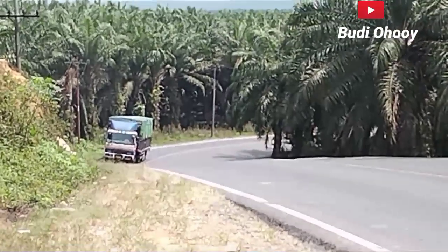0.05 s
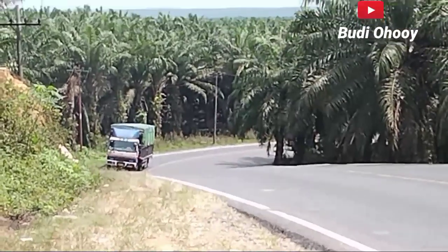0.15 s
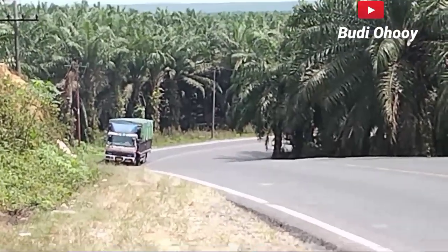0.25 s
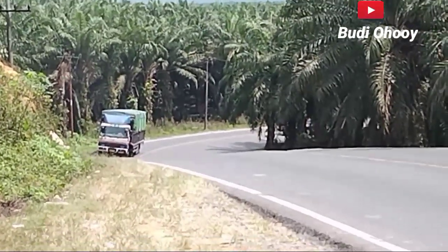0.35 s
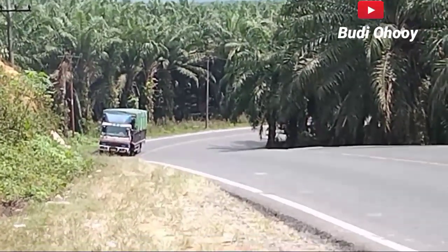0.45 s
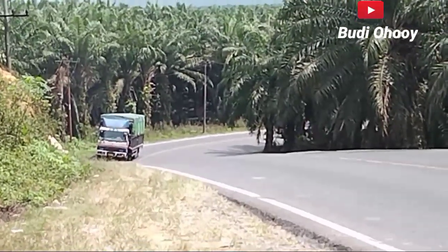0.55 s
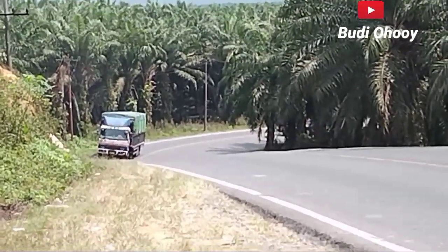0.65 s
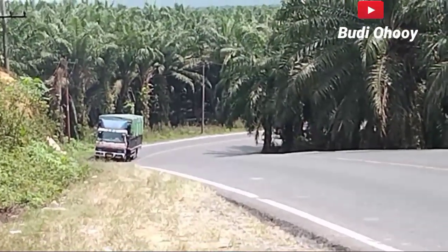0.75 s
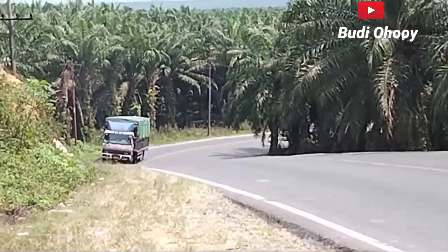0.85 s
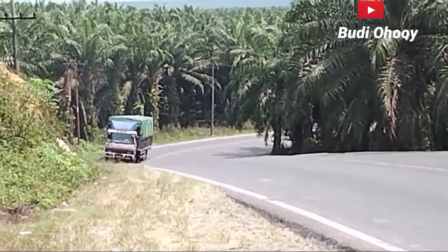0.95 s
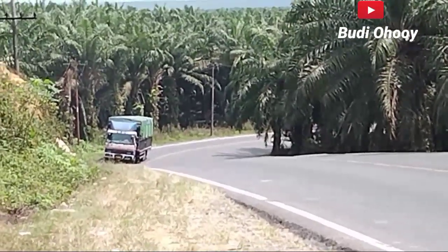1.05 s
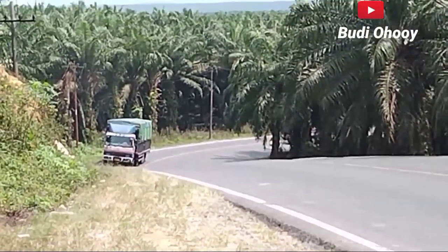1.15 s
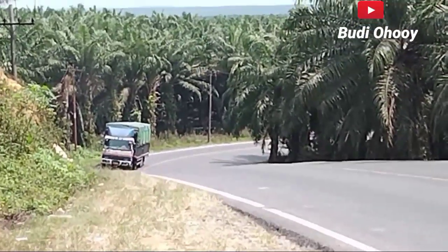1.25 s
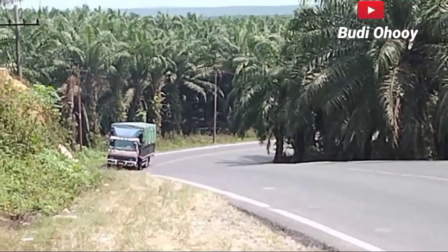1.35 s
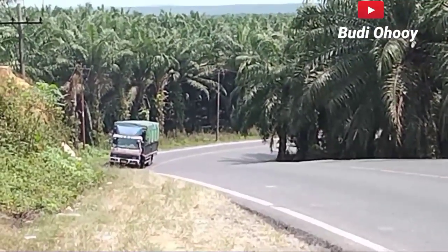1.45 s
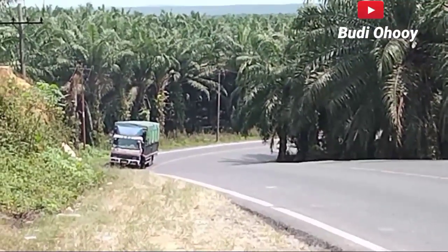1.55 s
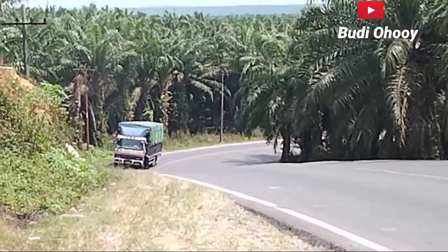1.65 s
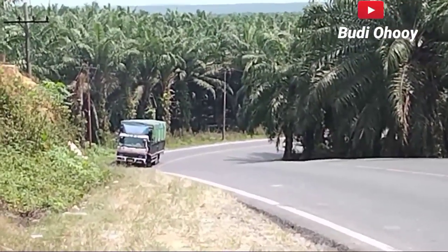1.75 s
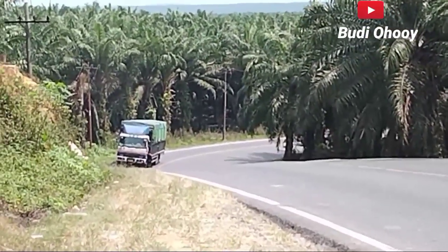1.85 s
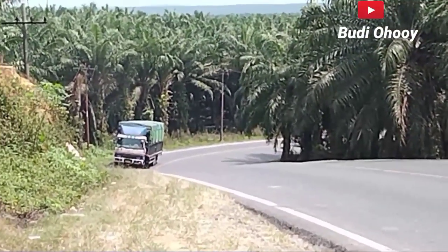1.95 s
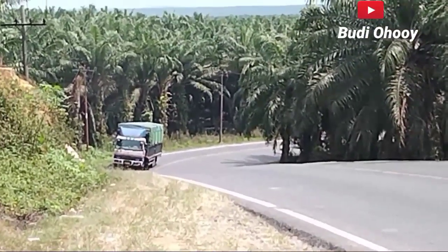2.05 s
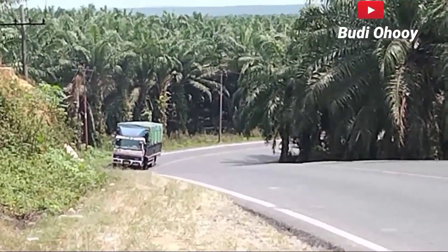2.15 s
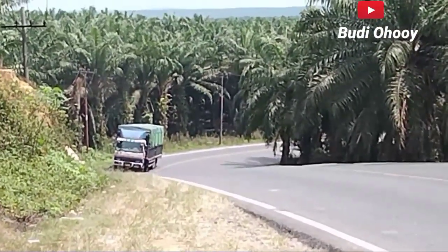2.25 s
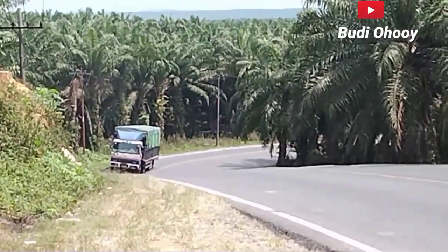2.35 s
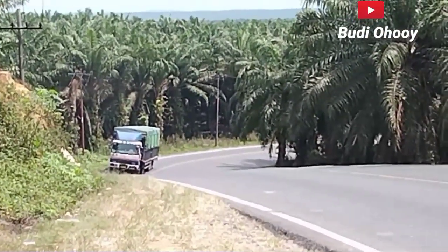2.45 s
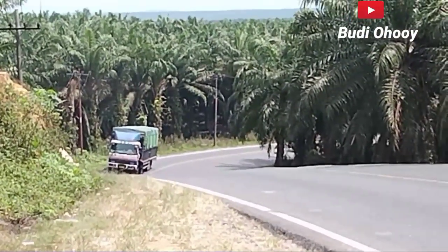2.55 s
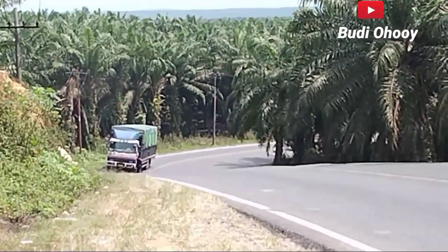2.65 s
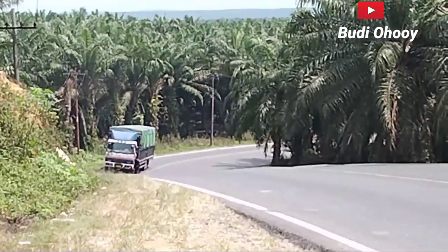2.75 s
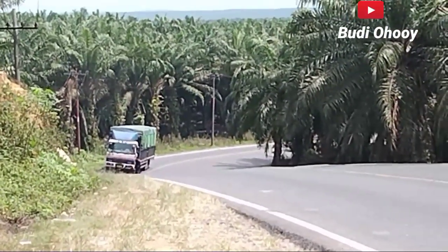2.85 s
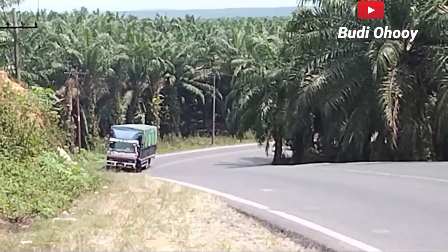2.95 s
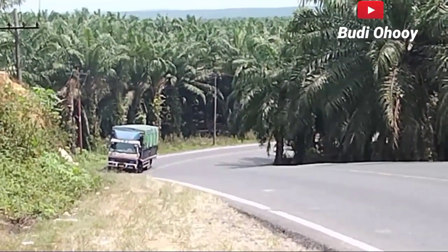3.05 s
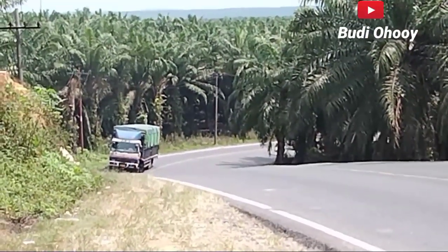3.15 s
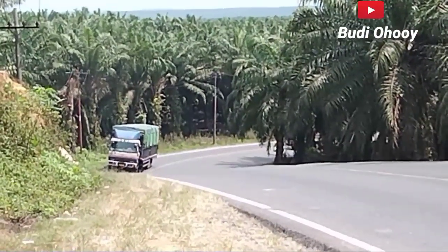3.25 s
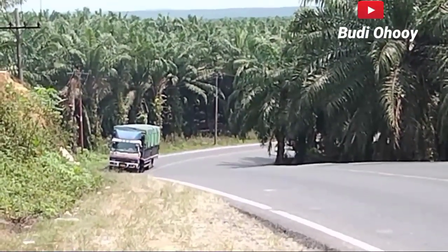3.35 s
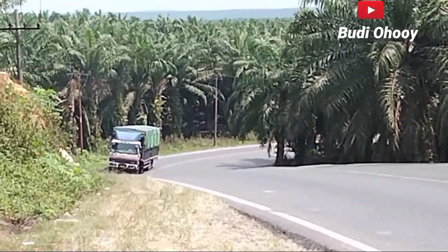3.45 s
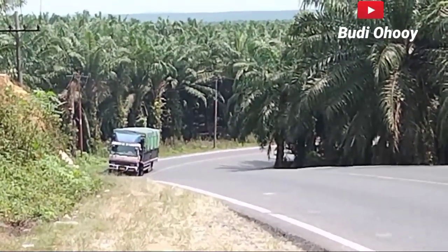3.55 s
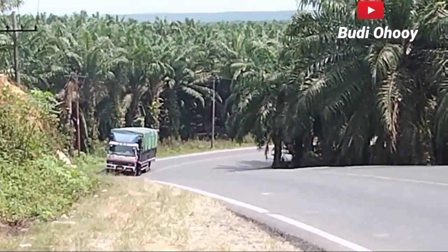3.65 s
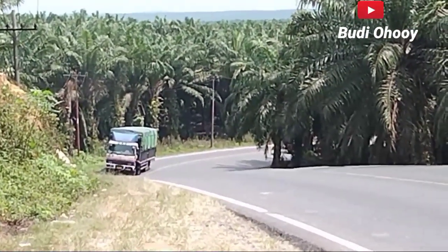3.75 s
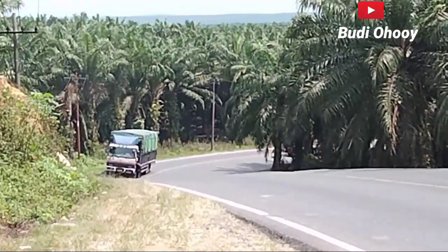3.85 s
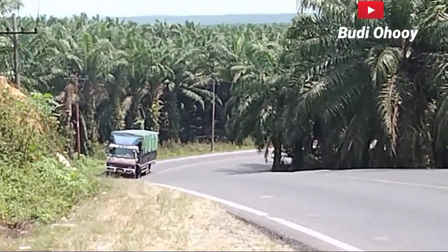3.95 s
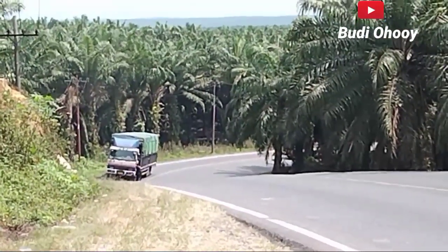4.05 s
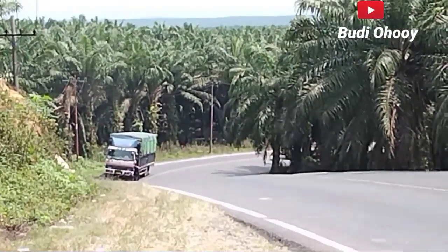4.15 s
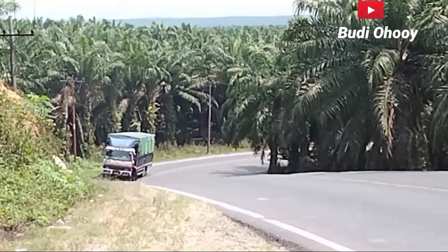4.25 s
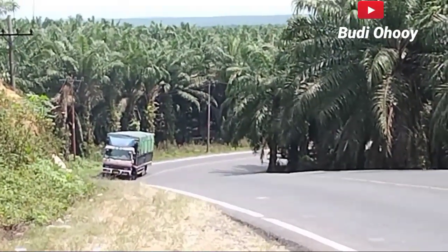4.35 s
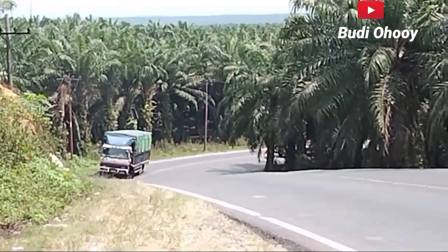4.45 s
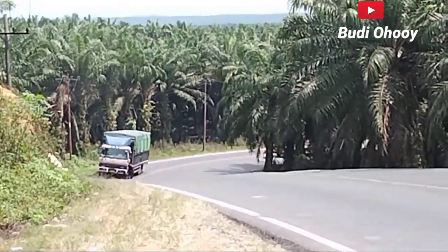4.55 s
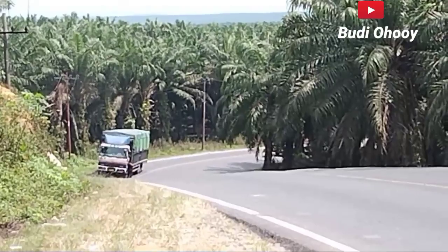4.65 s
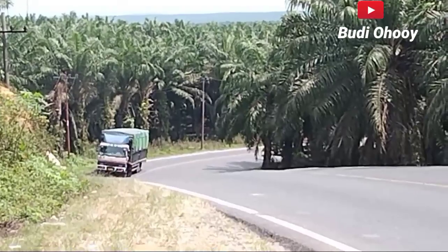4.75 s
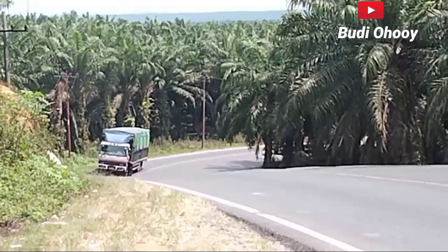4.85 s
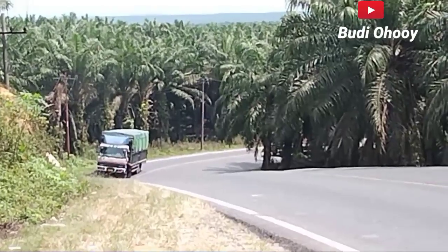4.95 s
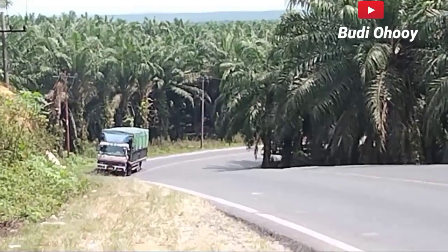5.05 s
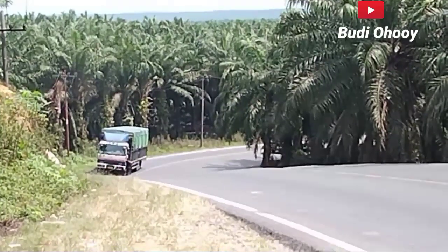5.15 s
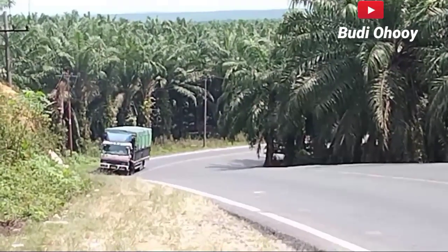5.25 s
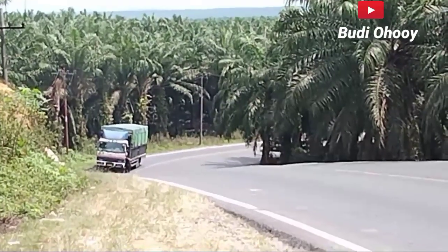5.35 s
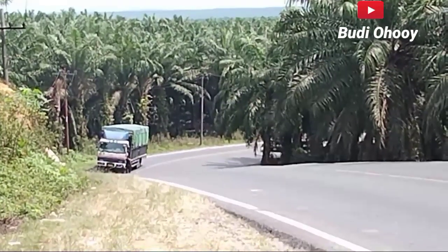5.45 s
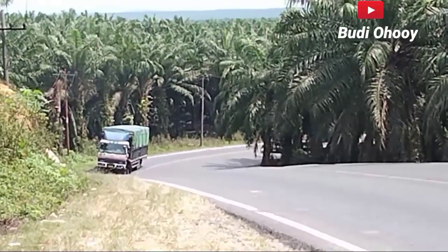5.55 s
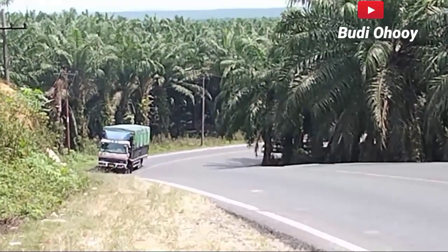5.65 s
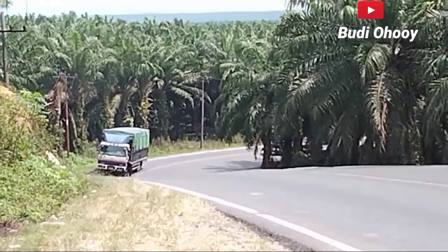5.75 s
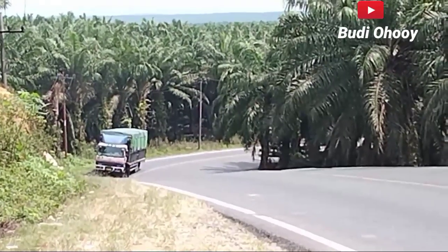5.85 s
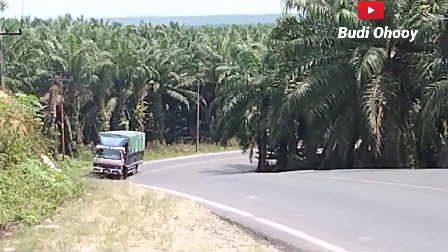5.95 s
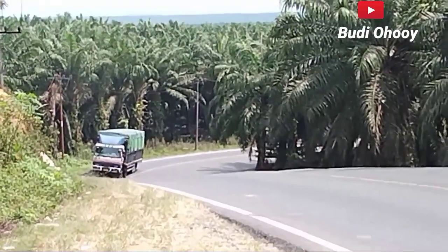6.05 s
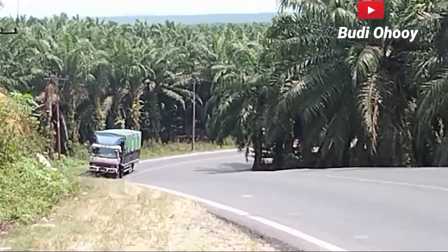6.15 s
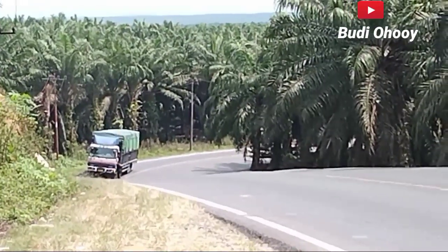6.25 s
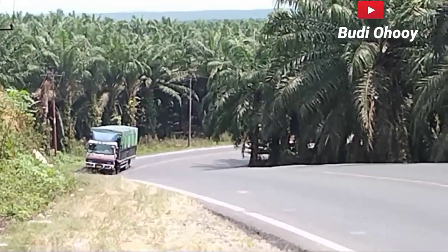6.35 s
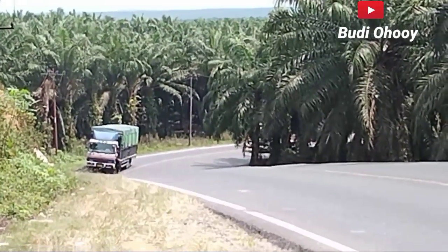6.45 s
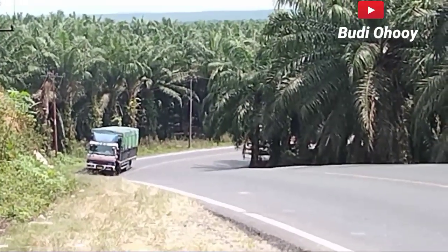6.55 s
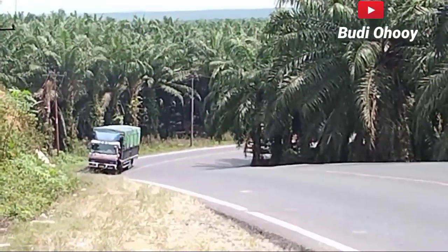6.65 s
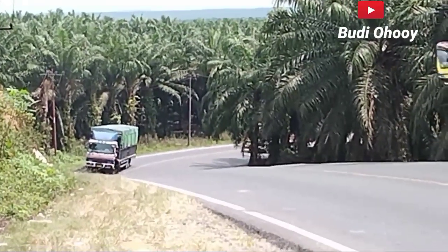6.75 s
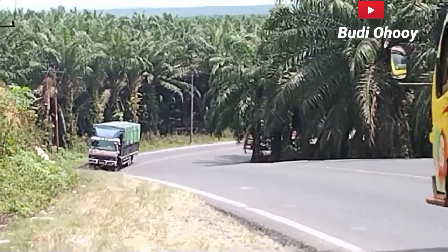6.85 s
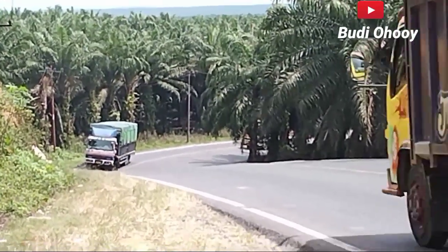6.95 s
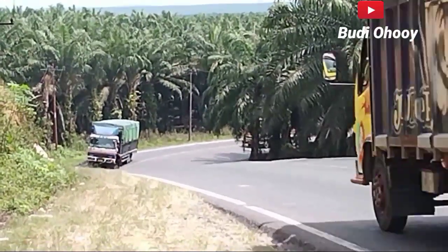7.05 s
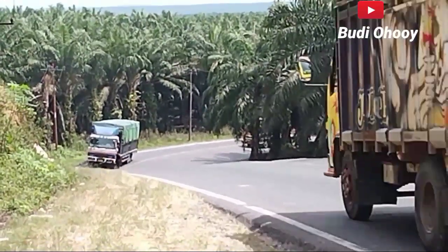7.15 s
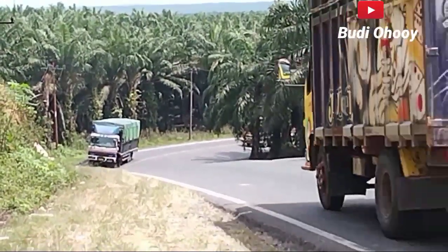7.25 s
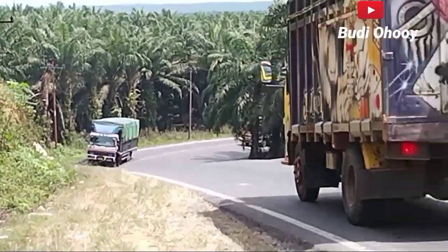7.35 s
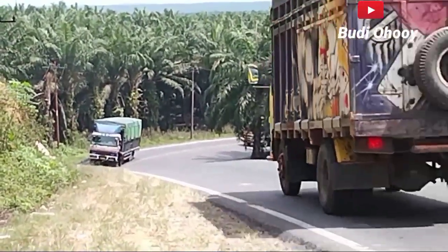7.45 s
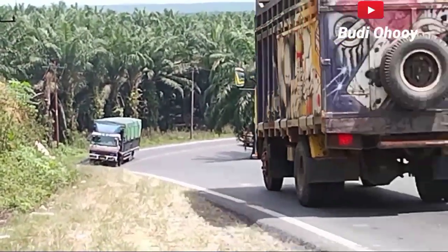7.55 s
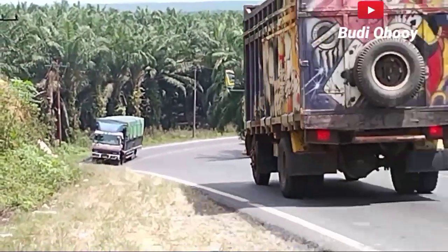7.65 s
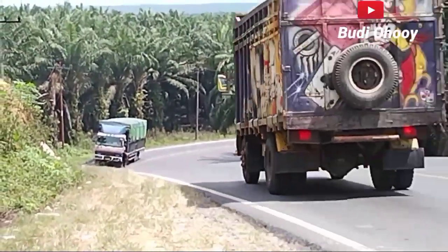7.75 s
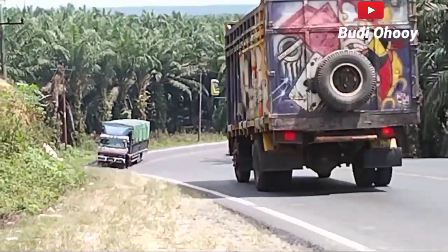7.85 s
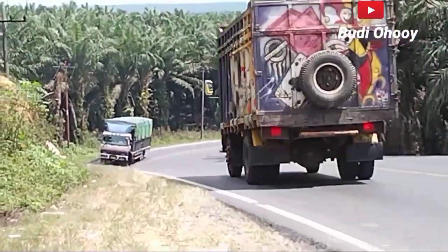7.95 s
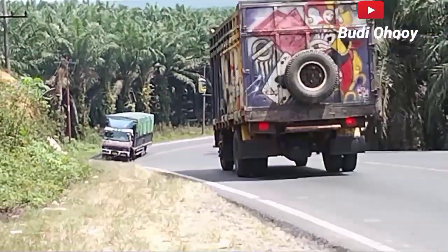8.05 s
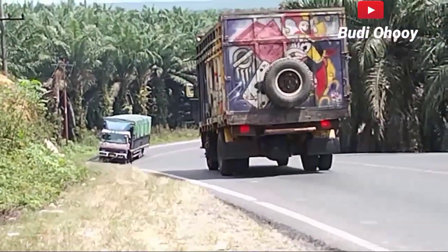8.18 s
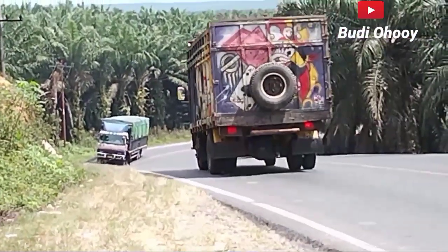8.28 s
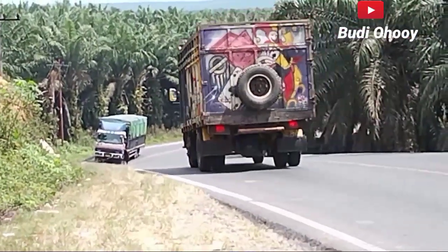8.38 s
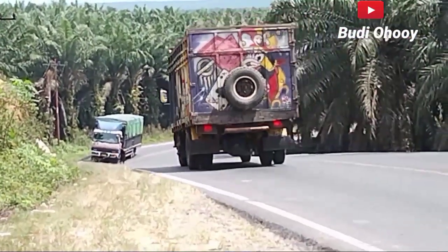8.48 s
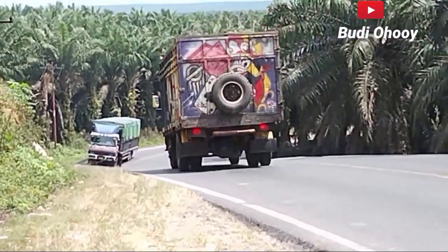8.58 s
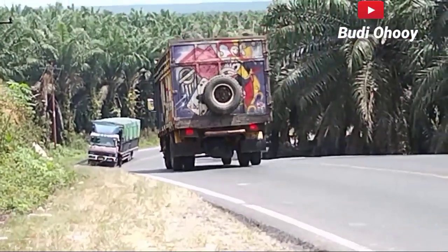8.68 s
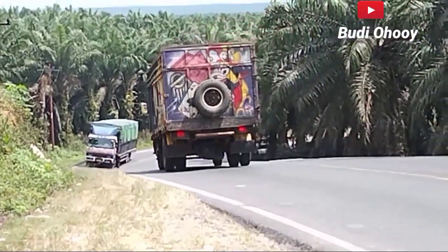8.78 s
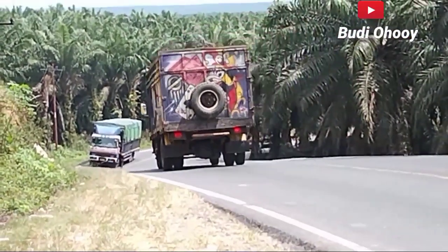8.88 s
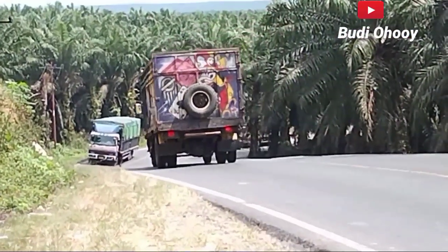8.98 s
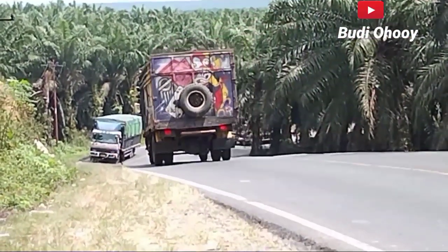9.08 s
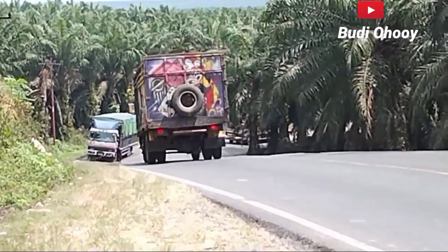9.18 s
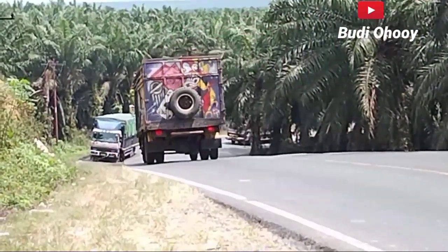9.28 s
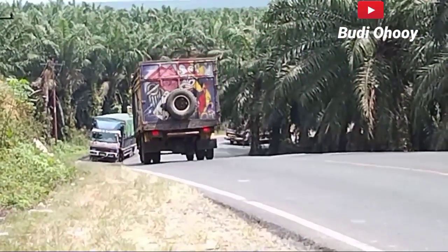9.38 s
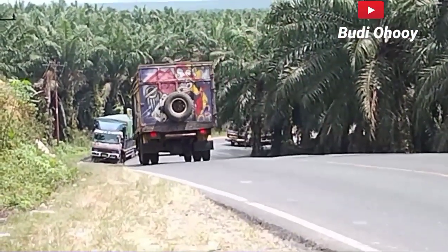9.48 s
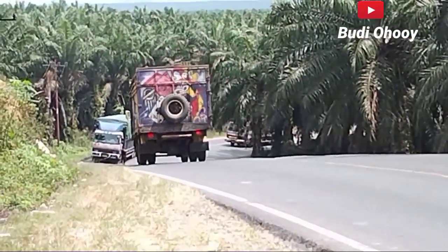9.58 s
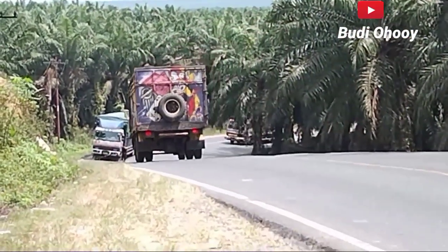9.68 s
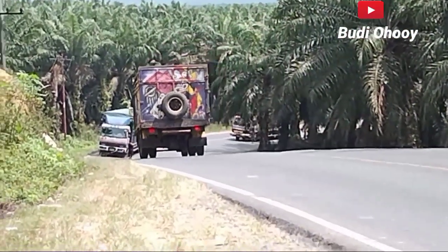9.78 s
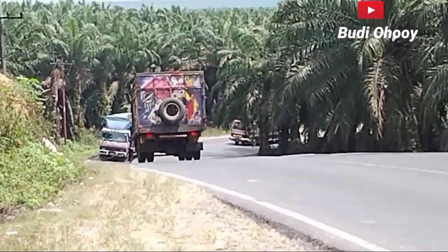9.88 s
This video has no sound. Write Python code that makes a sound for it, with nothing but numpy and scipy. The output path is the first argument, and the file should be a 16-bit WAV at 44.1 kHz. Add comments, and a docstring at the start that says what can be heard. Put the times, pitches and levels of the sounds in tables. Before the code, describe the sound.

One short distant horn toot echoes through palms, then a diesel truck drones up, rushes past and recedes, whining and rattling.

```python
"""Diesel truck passing on a hill road

A truck with a slatted cargo body drives past close by, its revs sinking. Exhaust drone (crank orders),
engine knock and tyre roar (noise throbbing with the firings) swell out of distant traffic. It draws away
with a gear whine locked to the crank, squeaking (wavering tones) and clacking (decaying noise bursts).
A horn (buzzing overtones) toots once in the distance and rings through the palms; a thin tick sounds close by.
"""
import sys
import numpy as np
from scipy import signal
from scipy.fft import rfft, irfft
from scipy.io import wavfile
from scipy.ndimage import uniform_filter1d

SR = 44100
rng = np.random.default_rng(int(sys.argv[2]) if len(sys.argv) > 2 else 0)


def wav_record(signal):
    """Record a signal, one row per channel, as 16-bit PCM in the file named by sys.argv[1]."""
    frames = np.transpose(np.atleast_2d(signal))
    bounded = np.clip(frames, -1, 1)
    # unit amplitude maps onto the largest positive 16-bit level
    quanta = np.round(bounded * 32767).astype(np.int16)
    wavfile.write(sys.argv[1], SR, quanta)


N = 437472
TIME = np.arange(N) / SR

# Roar colour, distant to gone by: freq_hz, relative_db_per_hz
ROAR_FAR = [(25, -35), (45, -3), (70, -1), (130, 1.5), (220, 3.5), (300, -4), (400, -2.5), (700, -9),
            (1400, -11), (2000, -14), (2400, -22.5), (2900, -29), (3400, -39.5), (4500, -46)]
ROAR_COMING = [(25, -24), (45, -25), (80, -7), (130, -0.5), (220, -1), (300, -10.5), (400, -5), (650, -8.5),
               (1000, -11), (1400, -13), (1800, -10), (2600, -19), (3600, -24), (5000, -22.5)]
ROAR_ABREAST = [(25, -30), (45, -15), (80, -2), (160, -7.5), (260, -9.5), (390, 1), (520, -4.5),
                (800, -9.5), (1450, -9), (1900, -15.5), (2500, -14.5), (3200, -21.5), (4200, -27),
                (5200, -60)]
ROAR_LEAVING = [(25, -14), (45, -24), (90, -4), (220, 3), (340, -2), (470, -8.5), (590, -19.5), (720, -5),
                (1000, -5), (1600, -14), (2300, -16.5), (2900, -15), (4000, -16.5), (5000, -29)]
ROAR_GONE = [(25, -29), (45, -23), (90, -7), (160, 0), (340, -4.5), (480, -12), (590, -21), (740, -13.5),
             (1000, -13.5), (1500, -21.5), (2300, -26), (2900, -25), (4000, -27), (5000, -34)]
# Hiss colour, ahead of and behind the truck: freq_hz, relative_db_per_hz
HISS_FRONT = [(2530, -32), (4300, -18), (4510, 0), (5900, -1.5), (7590, 4), (9020, -3), (11300, -6.5),
              (12800, -7), (14700, -3), (15500, -4)]
HISS_REAR = [(2530, -32), (4300, -2), (4940, -8.5), (7270, 1), (7970, -0.5), (8680, -6), (10800, -11),
             (12500, -12.5), (14800, -8.5), (15500, -11)]
# Engine panels ringing in the roar: freq_hz, width_hz, front_db, rear_db
PANELS = [(1384, 210, 4, -1.5), (1563, 93, -2.5, 2.5), (1790, 98, 1, -1.5), (2035, 190, -2, 2.5),
          (2460, 170, -1.5, -6), (2820, 220, 1, 3), (3570, 100, 2.5, 2.5)]
# Resonances that beam sideways, heard as they sweep by: centre_s, spread_s, freq_hz, width_hz, peak_db
BEAMS = [(6.094, 0.42, 1450, 320, 2.5), (6.548, 0.25, 3240, 420, 5.5)]
# Roar colour changes: centre_s, takes_s, onward_colours
TURNING = [(2.55, 0.6, 0.45), (6.17, 0.25, 1.17), (6.9, 0.7, 1.0), (8.45, 0.3, 1.05)]
# Crank speed, sinking on the climb: time_s, turns_per_s
REVS = [(0, 55.9), (1.5, 54.15), (4, 49.74), (4.9, 47.74), (6.05, 46.72), (6.6, 45.45), (7.5, 45.5),
        (8.5, 44.9), (9.92, 40.1)]
# Swell and fade of the engine sound beyond distance, before each sound's share: time_s, swell_db
SWELL = [(0.3, -10), (1.55, -6), (1.85, 0.7), (2.35, 0), (2.85, -4), (3.35, 0), (4.75, 1.6), (5.1, -4),
         (5.95, 1.8), (6.7, -1), (7.8, 4), (9.1, -3.5)]
# Exhaust notes: crank_order, ahead_db, behind_db, handover_s, loss_db_per_doubling
EXHAUST_ORDERS = [(2, -31, -43.5, 6.34, 6.4), (3, -37.5, -24.7, 5.92, 6.6), (4, -33, -36, 6.8, 7.5)]
# Level of roar, hiss and whine in passing:
# nearest_s, nearest_m, top_db, coming_db_per_doubling, going_db_per_doubling, swell_share
ROAR_PASS = (6.26, 7.6, -25.3, 10.8, 7.4, 0.3)
HISS_PASS = (6.4, 6.4, -38.6, 11.5, 7.7, 0.38)
WHINE_PASS = (6.3, 6.2, -26.2, 9.4, 9.4, 1.05)
# Gear whine partials: multiple, level_db
WHINE_PARTIALS = [(4, -5), (5, -1.5), (6, -13)]
# Horn overtones, interpolated between rows: multiple, relative_db
HORN_PARTIALS = [(2, -8.5), (4, -8.5), (5, -8), (7, -6.5), (8, -10), (9, -22), (12, -27.5), (15, -36),
                 (18, -39), (24, -36.5), (30, -45.5), (42, -52)]
# Horn echoes off the bank and the road: delay_s, level_db
ECHOES = [(0.01, -19), (0.027, -13), (.047, -25), (.072, -25)]
# Spring squeaks: start_s, length_s, pitch_hz, level_db, octave_db
SQUEAKS = [(1.5, 0.15, 4400, -72.5, -3.5), (2.559, 0.14, 4320, -69, -9), (2.659, 0.15, 4550, -73.5, -1),
           (3.6, .14, 4860, -64, -17), (4.46, .1, 4290, -60, -16), (4.554, 0.091, 4800, -64, -17),
           (5.725, .06, 4310, -42, -8), (5.826, 0.022, 4280, -55, -14), (6.368, 0.028, 4150, -43, -1),
           (6.635, 0.034, 4050, -42, -8), (6.694, .025, 2850, -37, -7), (8.141, 0.021, 3990, -42, 2),
           (8.194, 0.034, 3980, -46, -8), (8.935, .05, 3980, -48.5, -3)]
# Cargo body clacks: start_s, snap_db, thud_db
CLACKS = [(6.79, -37, -42), (6.973, -34, -49), (7.151, -38, -26), (7.828, -35.5, -32), (7.89, -70, -41),
          (8.308, -39.5, -58), (8.436, -41, -27.5), (9.171, -42.5, -40), (9.449, -50, -47),
          (9.802, -51, -42)]
# Cargo body resonances: freq_hz, width_hz, relative_db
BODY_MODES = [(200, 98, 6), (340, 53, 4), (910, 420, 0.5), (2800, 370, -6.5), (3499, 250, -12)]
# Snap colour: freq_hz, relative_db_per_hz
SNAP_COLOUR = [(2000, -25), (3400, 2), (5400, 0.5), (7200, 8), (9000, -8), (15000, -24)]
# Palm tail decay: freq_hz, t60_s
PALM_DECAY = [(300, 0.41), (1500, 0.68), (3000, 0.86), (5000, 0.93), (12000, 0.62)]
# Frond scatter, best in the treble: freq_hz, gain_db
FROND_GAIN = [(300, 1), (1000, 1), (2700, 0), (3600, 6), (8000, 9), (14000, 3)]
# Noise gate threshold: freq_hz, level_db_per_hz
GATE_THRESHOLD = [(1900, -112), (2500, -99), (3100, -99), (4000, -104), (6000, -110), (8000, -108),
                  (12000, -117), (15500, -115)]

PASS_S, SPEED_M_PER_S, GAP_M = 6.3, 12.5, 4.0  # abreast of the listener, road speed, gap to the lane
SOUND_M_PER_S = 343
EXHAUST_NEAREST_M = 6.2
ROAR_BAND_HZ, HISS_BAND_HZ = (230, 2200), (4500, 15000)  # bands that set each noise's level
TRAFFIC_DB, TRAFFIC_FADE_DB_PER_S = -49.0, 0.55
FIRST_COLOUR = 0.38  # between ROAR_FAR (0) and ROAR_COMING (1)
GEAR_RATIO, WHINE_FROM_S = 4.13, 6.88  # meshings per crank turn, centre of fade-in
HORN_S, HORN_HZ, HORN_DB = 0.883, 337.3, -29.5
HORN_ATTACK_S, HORN_HOLD_S, HORN_RELEASE_DB_PER_S = 0.016, 0.019, 260
EDGE_HZ = 15600


def amp(db):
    """Decibels to gain."""
    return 10 ** (np.asarray(db) / 20)


def evened(x):
    """Scale to rms 1."""
    return x / np.sqrt(np.mean(x ** 2) + 1e-20)


def read(points, hz):
    """Interpolate a spectrum on a log-frequency axis."""
    f, value = np.transpose(points)
    return np.interp(np.log(hz + 1), np.log(f + 1), value)


def follow(rows, t):
    """Interpolate a (time_s, value) curve at times t."""
    s, value = np.transpose(rows)
    return np.interp(t, s, value)


def add(mix, start_s, sound):
    """Mix a sound in at start_s."""
    part = mix[round(start_s * SR):][:len(sound)]
    part += sound[:len(part)]


def cut(x, hz, kind):
    """Steep low-pass or high-pass."""
    return signal.sosfilt(signal.butter(8, hz, kind, fs=SR, output="sos"), x)


def step(t, centre_s, takes_s):
    """Smooth change from 0 to 1 around centre_s."""
    return (1 + np.tanh((t - centre_s) / takes_s)) / 2


def noise(gain, size):
    """Noise of rms 1 coloured by gain(hz)."""
    spectrum = rfft(rng.standard_normal(size))
    return evened(irfft(spectrum * gain(np.fft.rfftfreq(size, 1 / SR)), size))


def drift(rate_hz, size=N):
    """Slow random wander of rms 1."""
    return noise(lambda f: np.exp(-(f / rate_hz) ** 2), size)


def moving_noise(colours, position, band_hz, patchy_db, extra_db):
    """Noise sliding through a row of spectra, its power held constant within the band."""
    hz, t, z = signal.stft(rng.standard_normal(N), SR, nperseg=2048, noverlap=1536)
    at = np.clip(np.interp(t, TIME, position), 0, len(colours) - 1)
    db = sum(read(c, hz)[:, None] * np.maximum(1 - abs(at - k), 0) for k, c in enumerate(colours))
    gain = amp(db + extra_db(hz, t))
    in_band = (hz > band_hz[0]) & (hz < band_hz[1])
    gain /= np.sqrt((gain[in_band] ** 2).sum(0) / len(hz))
    patches = uniform_filter1d(rng.standard_normal(z.shape), size=14, axis=0)
    patches = evened(uniform_filter1d(patches, size=6, axis=1))
    shaped = z * gain * amp(patchy_db * patches)
    return signal.istft(shaped, SR, nperseg=2048, noverlap=1536)[1][:N]


def palms(x, build_s=0.016):
    """Scatter from trunks and fronds: a tail that builds up, each band dying at its own rate."""
    hz, t, z = signal.stft(rng.standard_normal(SR), SR, nperseg=256)
    z = z * amp(-60 * t / read(PALM_DECAY, hz)[:, None]) * (1 - np.exp(-t / build_s))
    size = np.linalg.norm(signal.istft(z, SR, nperseg=256)[1])
    tail = signal.istft(z * amp(read(FROND_GAIN, hz))[:, None], SR, nperseg=256)[1]
    return signal.fftconvolve(x, tail / size)[:N]


def tick(start_s=1.897, level_db=-61.5, t60_s=0.2, above_hz=7000):
    """One thin tick close by: decaying high-passed noise."""
    out, t = np.zeros(N), np.arange(8192) / SR
    hiss = cut(rng.standard_normal(len(t)), above_hz, "high")
    add(out, start_s, hiss * amp(level_db - 60 * t / t60_s))
    return out


def horn(rasp=0.014, overtone_db=-1.5, dulling=1.2, size=8192):
    """One tap: a buzzing diaphragm whose overtones die before its fundamental, with first echoes."""
    t = np.arange(size) / SR
    dying_db = -HORN_RELEASE_DB_PER_S * np.maximum(t - HORN_ATTACK_S - HORN_HOLD_S, 0)
    turns = np.cumsum(HORN_HZ * (1 + rasp * drift(250, size))) / SR
    overtones = np.zeros(size)
    for k in range(2, 43):
        partial_db = read(HORN_PARTIALS, k) + 2.3 * drift(34, size)
        overtones += amp(partial_db) * np.sin(2 * np.pi * (k * turns + rng.random()))
    buzz = np.sin(2 * np.pi * turns) + amp(overtone_db + dulling * dying_db) * overtones
    toot = np.minimum(t / HORN_ATTACK_S, 1) * amp(HORN_DB + dying_db) * buzz
    dulled = signal.lfilter(*signal.butter(1, 1500, fs=SR), toot)
    out = np.zeros(N)
    add(out, HORN_S, toot)
    for delay_s, echo_db in ECHOES:
        add(out, HORN_S + delay_s, amp(echo_db) * dulled)
    return out


def clacks(snap_t60_s=0.065, thud_t60_s=0.23):
    """Loose boards and latches strike: a bright snap and a resonant thud of the cargo body."""
    out, t = np.zeros(N), np.arange(16384) / SR

    def body(f):
        """Sum of the body resonances."""
        return sum(amp(db) / np.sqrt(width) / (1 + (2 * (f - hz) / width) ** 2)
                   for hz, width, db in BODY_MODES)

    for start_s, snap_db, thud_db in CLACKS:
        snap = noise(lambda f: amp(read(SNAP_COLOUR, f)), len(t)) * amp(snap_db - 60 * t / snap_t60_s)
        thud = noise(body, len(t)) * amp(thud_db - 60 * t / thud_t60_s)
        add(out, start_s, snap + thud)
    return out


def squeaks(waver=0.0089, flutter_db=3):
    """Dry springs rub: short wavering, fluttering tones with their octave."""
    out = np.zeros(N)
    for start_s, length_s, pitch_hz, level_db, octave_db in SQUEAKS:
        size = int(length_s * SR)
        pitch = pitch_hz * (1 + waver * drift(250, 16384)[:size])
        angle = 2 * np.pi * np.cumsum(pitch) / SR
        flutter = flutter_db * drift(44, 16384)[:size]
        envelope = amp(level_db + flutter) * signal.windows.tukey(size, 0.8)
        tone = np.sin(angle) + amp(octave_db) * np.sin(2 * angle)
        add(out, start_s, envelope * np.sqrt(2) * tone)
    return out


def doppler():
    """Pitch factor: high while the truck comes, low as it leaves."""
    along_m = SPEED_M_PER_S * (TIME - PASS_S)
    return 1 / (1 + SPEED_M_PER_S / SOUND_M_PER_S * along_m / np.hypot(along_m, GAP_M))


def passing_db(nearest_s, nearest_m, top_db, coming_db, going_db, swell_share):
    """Level falling per doubling of distance, at separate rates ahead and behind, plus a share of swell."""
    doublings = np.log2(np.hypot(1, SPEED_M_PER_S * (TIME - nearest_s) / nearest_m))
    loss_db = doublings * np.where(TIME < nearest_s, coming_db, going_db)
    return top_db - loss_db + swell_share * follow(SWELL, TIME)


def behind(t):
    """0 while the truck comes, 1 once it has gone by."""
    return np.interp(t, [6.3, 6.7], [0, 1])


def panels(hz, t):
    """Panel peaks and dips (dB) changing as the engine goes by, plus the sideways beams."""
    def peak(f, width):
        """Bell around f."""
        return np.exp(-(2 * (hz - f) / width) ** 2)

    rings = sum(np.outer(peak(f, width), front + (rear - front) * behind(t))
                for f, width, front, rear in PANELS)
    beams = sum(db * np.outer(peak(f, width), np.exp(-((t - s) / spread_s) ** 2))
                for s, spread_s, f, width, db in BEAMS)
    return rings + beams


def nearness(hz, t, closest_s=6.39, spread_s=0.29, top_db=4):
    """Tilt (dB) lifting the top of the hiss while the engine is closest, lowering it otherwise."""
    close = np.exp(-((t - closest_s) / spread_s) ** 2)
    return np.outer(np.interp(hz, [9000, 15000], [0, top_db]), close - 0.4)


def whine(speed, waver=0.0025, flutter_db=1.6):
    """Meshing gears, locked to the crankshaft and heard from behind the truck."""
    teeth = np.cumsum(GEAR_RATIO * speed * (1 + waver * drift(26.3))) / SR
    tones = sum(amp(db + flutter_db * drift(9.7)) * np.sin(2 * np.pi * round(k) * teeth)
                for k, db in WHINE_PARTIALS)
    return step(TIME, WHINE_FROM_S, takes_s=0.12) * amp(passing_db(*WHINE_PASS)) * tones


def knock(turns, decay_cycles=0.18, uneven=0.64):
    """Two firings a turn, each decaying within its cycle; four cylinders and every stroke differ."""
    firing, phase = np.divmod(2 * turns, 1)
    cylinders = np.resize([0.35, -0.2, -0.073, -0.16], 2048)
    strength = 1 + uneven * rng.standard_normal(2048) + cylinders
    pulses = strength[firing.astype(int)] * np.exp(-phase / decay_cycles)
    return evened(pulses - pulses.mean())


def roar(turns, roar_knock=0.13, hiss_knock=0.076, knock_above_hz=650, split_hz=4400, flicker_db=0.83):
    """Tyre and engine noise out of distant traffic, throbbing with the firings, recoloured in passing."""
    traffic_db = TRAFFIC_DB - TRAFFIC_FADE_DB_PER_S * TIME
    low_level = np.hypot(amp(passing_db(*ROAR_PASS)), amp(traffic_db))
    high_level = amp(passing_db(*HISS_PASS) + flicker_db * drift(25))
    colour = FIRST_COLOUR + sum(onward * step(TIME, s, takes_s) for s, takes_s, onward in TURNING)
    beat = signal.lfilter(*signal.butter(2, 500, fs=SR), knock(turns))
    roar_colours = [ROAR_FAR, ROAR_COMING, ROAR_ABREAST, ROAR_LEAVING, ROAR_GONE]
    low = moving_noise(roar_colours, colour, ROAR_BAND_HZ, patchy_db=1, extra_db=panels)
    high = moving_noise([HISS_FRONT, HISS_REAR], behind(TIME), HISS_BAND_HZ, patchy_db=1.73,
                        extra_db=nearness)
    # only the upper part of the roar throbs
    clatter = signal.sosfiltfilt(signal.butter(2, knock_above_hz, "high", fs=SR, output="sos"), low)
    low = cut(low + roar_knock * beat * clatter, split_hz, "low")
    high = cut(high * (1 + hiss_knock * beat), split_hz, "high")
    return low * low_level + high * high_level


def exhaust(turns, shake_db=1.7, overtone_db=-12, fall_db=0.77):
    """Three strong unsteady crank orders under a comb of weak half orders, strongest from the front."""
    drone, orders_db = np.zeros(N), []
    for order, ahead_db, behind_db, handover_s, loss_db in EXHAUST_ORDERS:
        top_db = ahead_db + (behind_db - ahead_db) * step(TIME, handover_s, takes_s=0.15)
        db = passing_db(PASS_S, EXHAUST_NEAREST_M, top_db, loss_db, loss_db, 1)
        orders_db.append(db)
        tone = np.cos(2 * np.pi * (round(order) * turns + rng.random()))
        drone += amp(db + shake_db * drift(11)) * tone
    comb = np.zeros(N)
    for k in range(9, 20):  # crank order k / 2
        tone = np.cos(np.pi * (k * turns + 2 * rng.random()))
        comb += amp(-fall_db * k) * (1 + 0.74 * drift(3.8)) * tone
    frontal_db = np.interp(TIME, [1.5, 5, 6.6], [5, 0, -4])
    comb_db = overtone_db + np.max(orders_db, axis=0) + frontal_db
    return np.sqrt(2) * (drone + amp(comb_db) * comb)


def scene():
    """Truck, horn and tick, with the palms answering horn and rattle."""
    speed = follow(REVS, TIME) * doppler()  # crank turns per second as heard
    turns = np.cumsum(speed * (1 + 0.0029 * drift(13.4))) / SR
    toot = horn()
    rattle = squeaks() + clacks()
    truck = exhaust(turns) + roar(turns) + whine(speed) + rattle
    scatter = palms(amp(-8.5) * toot + amp(-15) * rattle)
    return (truck + toot + tick() + scatter)[None]


def record(dry, depth_db=27, knee_db=1.86, self_noise_db=-91):
    """Noise gate turning down each faint band, then the recorder's own faint hiss and band limit."""
    hz, t, z = signal.stft(dry[0], SR, nperseg=512, noverlap=384, scaling="psd")
    power = uniform_filter1d(2 * abs(z) ** 2, size=3, axis=0)
    power = signal.lfilter([0.1], [1, -0.9], power, axis=1)  # smoothed over time
    over_db = 10 * np.log10(abs(power) + 1e-20) - read(GATE_THRESHOLD, hz)[:, None]
    shut = (1 - np.tanh(over_db / knee_db / 2)) / 2
    gated = signal.istft(z * amp(-depth_db * shut), SR, nperseg=512, noverlap=384, scaling="psd")[1][:N]
    hissy = gated + amp(self_noise_db) * rng.standard_normal(N)
    band_limit = signal.firwin(511, EDGE_HZ, window=("kaiser", 9), fs=SR)
    return signal.oaconvolve(hissy, band_limit, "same")[None]


dry = scene()
out = record(dry)
wav_record(out)
```